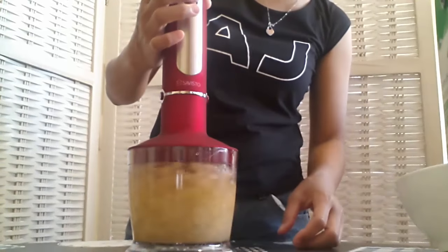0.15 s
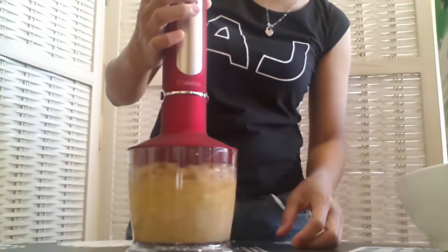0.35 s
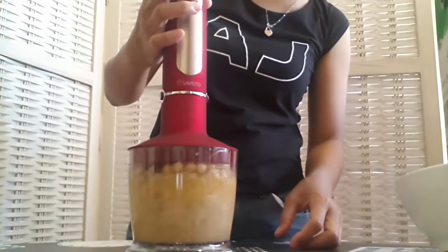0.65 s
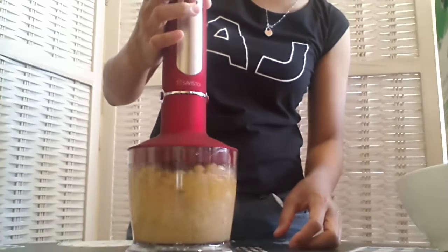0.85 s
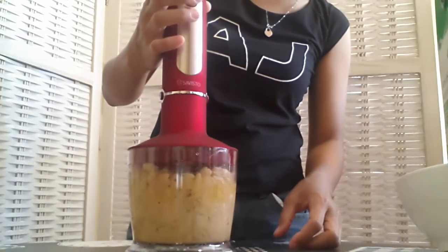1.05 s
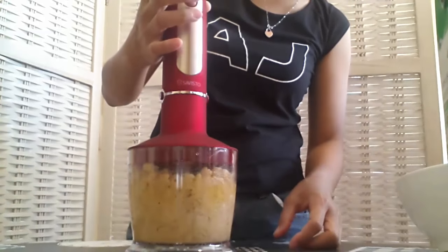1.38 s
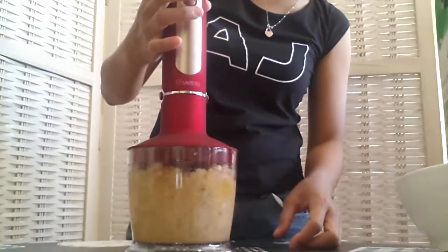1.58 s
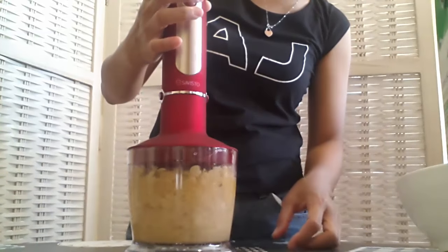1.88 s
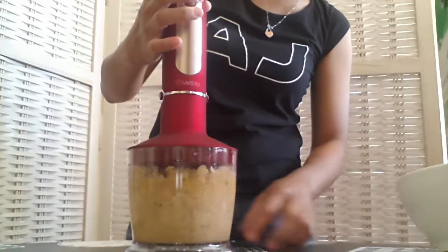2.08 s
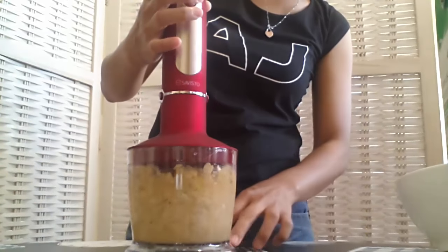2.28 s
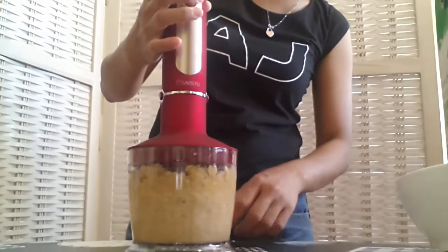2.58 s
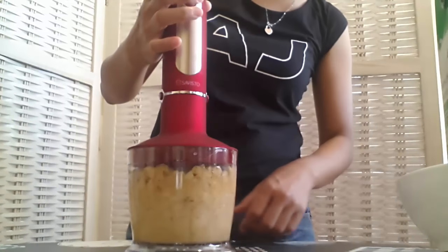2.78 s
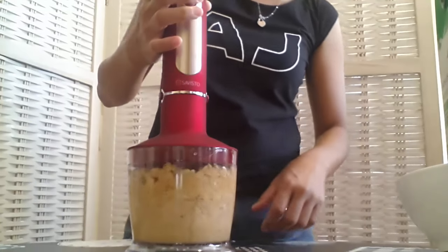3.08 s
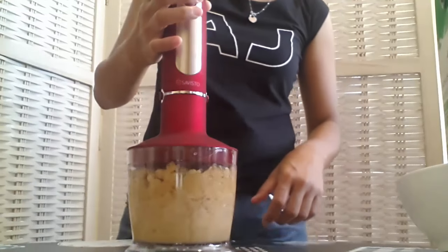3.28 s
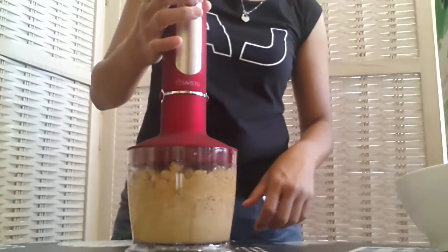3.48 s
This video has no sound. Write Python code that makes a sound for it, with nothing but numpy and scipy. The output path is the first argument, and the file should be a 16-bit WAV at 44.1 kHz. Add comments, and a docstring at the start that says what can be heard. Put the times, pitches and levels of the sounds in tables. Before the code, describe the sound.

An electric hand blender grinds paste, winds down, and thumps back into a steady whir.

```python
"""Hand blender grinding paste

A hand blender on a chopper bowl grinds a thick paste, coasts to a stop, and starts again with a thump.
Its gears whine and rattle in the plastic housing, the motor brushes hiss in time with the mains power,
and the blade churns the food. A small kitchen rings around it, over a quiet background rumble."""
import sys
import numpy as np
from scipy import signal
from scipy.fft import rfft, irfft
from scipy.io import wavfile
from scipy.ndimage import uniform_filter1d

SR = 44100
rng = np.random.default_rng(int(sys.argv[2]) if len(sys.argv) > 2 else 0)


def inscribe(sig):
    """Save sig as 16-bit PCM at rate SR to the path in sys.argv[1].

    A 1-D sig is mono; a 2-D sig holds one channel per row.
    Samples are clipped to [-1, 1] before scaling.
    """
    pcm = np.round(np.clip(np.atleast_2d(sig).T, -1, 1) * 32767)
    wavfile.write(sys.argv[1], SR, pcm.astype(np.int16))


N = 160965
T = np.arange(N) / SR
TEETH, GEAR_RATIO, MAINS_PULSE_HZ = 36, 5, 100
FULL_SPEED = 37  # blade turns a second


def amp(db):
    """Turns decibels into a gain to multiply by."""
    return 10 ** (np.asarray(db) / 20)


def unit(x):
    """Scales a signal to an average (rms) size of 1."""
    return x / np.sqrt(np.mean(x ** 2) + 1e-20)


def curve(points):
    """Joins a table's points over time with straight lines."""
    return np.interp(T, *np.transpose(points))


def read(points, hz):
    """Looks up frequencies in a table, on a scale of octaves."""
    f, value = np.transpose(points)
    return np.interp(np.log(hz + 1), np.log(f + 1), value)


def drift(rate_hz):
    """A random wander of size 1, mostly slower than rate_hz."""
    f = np.fft.rfftfreq(N, 1 / SR)
    return unit(irfft(rfft(rng.standard_normal(N)) * (f > 1) / (1 + (f / rate_hz) ** 4), N))


def body(x, colour, rings):
    """Gives x an object's broad tone colour and the pitches it rings at."""
    hz = np.fft.rfftfreq(8192, 1 / SR)
    db = read(colour, hz) + sum(lift / (1 + (2 * (hz - f) / width) ** 2) for f, width, lift in rings)
    log_gain = np.log(amp(np.r_[db, db[-2:0:-1]]))
    response = np.fft.ifft(np.exp(np.conj(signal.hilbert(log_gain)))).real  # rings only after a hit
    return unit(signal.oaconvolve(x, response[:len(hz)])[:N])


# How fast the blade spins: (time [s], speed [turns/s])
BLADE_SPEED = [(0, 37.0), (.18, 36.52), (.46, 36.9), (.56, 36.65), (.66, 37.0), (.8, 37.2), (.915, 37.0),
               (.96, 32.5), (1.05, 21), (1.25, .5), (1.465, .5), (1.5, 14), (1.52, 28), (1.55, 32.6),
               (1.58, 35.8), (1.62, 37.1), (1.92, 37.17), (2.01, 37.57), (2.3, 37.6), (2.45, 37.96),
               (2.84, 38.11), (2.95, 37.8), (3.03, 38.12), (3.25, 38.29), (3.65, 38.6)]


def motor():
    """The motor runs, stops and restarts: gives the blade's speed, turns so far and acceleration."""
    steady = curve(BLADE_SPEED)
    speed = steady * (1 + .0006 * drift(14))
    return speed, np.cumsum(speed) / SR, uniform_filter1d(np.gradient(steady, T), size=600)


# Repeating swells in the load: (rate [cycles/turn], gear and paste depth [0-1], hiss depth [0-1])
LOAD_SWELLS = [(1, .17, .27), (2, .19, .27), (3, .04, .33), (GEAR_RATIO, .22, .05)]
GEAR_COLUMN, HISS_COLUMN = 1, 2


def load(turns, column):
    """The blade works unevenly within each turn, so the level pulses."""
    return 1 + sum(row[column] * np.cos(2 * np.pi * (row[0] * turns + rng.random()))
                   for row in LOAD_SWELLS)


# How loud the gears rattle: (time [s], level [dB])
RATTLE_LEVEL = [(0, -17), (.3, -16.5), (.9, -16.5), (.96, -19), (1.02, -27.5), (1.1, -50), (1.2, -45),
                (1.3, -65), (1.47, -58), (1.501, -26.5), (1.513, -9.5), (1.56, -17.5), (1.59, -17.5),
                (2.1, -17), (2.8, -17), (3.65, -18)]
# Tone colour of the plastic housing: (frequency [Hz], level [dB])
HOUSING_COLOUR = [(25, -14.5), (50, -19.5), (110, -10.5), (175, -14), (250, -9.5), (330, -3), (520, -2.5),
                  (600, -4.5), (700, 0), (870, -9), (1050, -4.5), (1500, 1.5), (2200, -7), (2600, -0.5),
                  (3100, -9.5), (3600, -12.5), (4500, -21), (8000, -30), (16000, -56)]
# Where the housing rings: (frequency [Hz], width [Hz], boost [dB])
HOUSING_PEAKS = [(329.4, 34, 5.5), (449, 43, 9.5), (768.4, 63, 6.5), (959, 120, 7), (1470, 500, -1),
                 (1844, 60, 1), (2757, 80, 6.5), (3585, 180, 3.5)]


def rattle(turns, spread_db=3.5, scatter_teeth=.3):
    """Every gear tooth knocks on the housing, a little early or late, with its own force."""
    force, scatter = rng.standard_normal((2, N))
    teeth = np.arange(int(turns[-1] * TEETH))
    contact = teeth + scatter_teeth * scatter[teeth] + rng.random(N)[teeth]
    hit_samples = np.interp(contact, turns * TEETH, np.arange(N)).astype(int)
    strength = amp(spread_db * np.minimum(force[teeth], 2)) * rng.choice([-1, 1], N)[teeth]
    knocks = np.bincount(hit_samples, strength, N) * load(turns, GEAR_COLUMN)
    knocks *= amp(drift(24.8))  # lumps sway the level by about 1 dB
    return body(knocks, HOUSING_COLOUR, HOUSING_PEAKS) * amp(curve(RATTLE_LEVEL))


# How loud the brushes hiss: (time [s], level [dB])
BRUSH_LEVEL = [(0, -25.5), (.5, -24), (.92, -24), (1.0, -45), (1.1, -50), (1.3, -80), (1.47, -78),
               (1.515, -24), (1.55, -24), (1.6, -25), (2.15, -24), (2.8, -25), (3.65, -25.5)]
# Tone colour of the hiss: (frequency [Hz], level [dB])
BRUSH_COLOUR = [(25, -58), (2500, -38.5), (3600, 3), (4200, -1), (4500, -10.5), (6300, -10), (7000, -8),
                (8400, -8.5), (8900, -16.5), (10100, -19.5), (10600, -11.5), (11500, -13.5), (12700, -21.5),
                (16000, -22)]
# Where the motor rings: (frequency [Hz], width [Hz], boost [dB])
MOTOR_PEAKS = [(3935, 286, 11.4), (4900, 150, 3.6)]


def brushes(turns, mains_depth=.36):
    """The motor's sliding contacts hiss, pulsing with the mains and the load."""
    pulse = load(turns, HISS_COLUMN) * (1 + mains_depth * np.cos(2 * np.pi * MAINS_PULSE_HZ * T))
    return body(rng.standard_normal(N) * pulse, BRUSH_COLOUR, MOTOR_PEAKS) * amp(curve(BRUSH_LEVEL))


# How loud the food churns: (time [s], level [dB])
CHURN_LEVEL = [(0, -19.5), (.3, -18), (.8, -20.5), (.96, -21.5), (1.15, -59), (1.49, -78), (1.53, -19),
               (1.7, -22.5), (2.1, -23.5), (2.8, -33.5), (3.65, -31.5)]
# Tone colour of the paste: (frequency [Hz], level [dB])
PASTE_COLOUR = [(25, -25), (200, -23.5), (350, -8), (480, -0.5), (620, -9), (1500, -11.5), (2100, -12.5),
                (3000, -14), (16000, -86)]
# Where the bowl rings: (frequency [Hz], width [Hz], boost [dB])
BOWL_PEAKS = [(496, 48, 14.5), (1892, 184, 20.8)]


def churn(turns, lumps_db=2, pitch_sway=.03034, split_hz=900):
    """The blade throws lumps of paste against the bowl, less as the paste gets smooth."""
    lumps = rng.standard_normal(N) * load(turns, GEAR_COLUMN) * amp(lumps_db * drift(44))
    bowl = body(lumps, PASTE_COLOUR, BOWL_PEAKS)
    low = signal.sosfilt(signal.butter(2, split_hz, fs=SR, output="sos"), bowl)
    high = signal.sosfilt(signal.butter(2, split_hz, "high", fs=SR, output="sos"), bowl)
    bent_time = T + np.cumsum(pitch_sway * drift(7.27)) / SR  # moving paste shifts the bowl's low ring
    return (np.interp(bent_time, T, low) + high) * amp(curve(CHURN_LEVEL))


# Pitch of each gear tone: (rate [cycles per blade turn])
GEAR_TONES = [7, 12, 21, 27, 33, 34, 35, 36, 37, 39, 40, 42, 48, 76]
# Strength of those tones, in the same order: (level [dB])
GEAR_LEVELS = [-45.5, -32.5, -35.5, -40, -37.5, -31.5, -43, -31.5, -32.5, -30.5, -41, -32, -46.5, -29.5]
# Strength of the whine an octave above the tooth rate: (time [s], level [dB])
OCTAVE_LEVEL = [(0, -32), (.4, -28), (.9, -31), (1.6, -33), (1.95, -30), (2.1, -24), (2.6, -22), (2.9, -25),
                (3.25, -24.5), (3.65, -27)]


def whine(turns, speed, acceleration, flutter=.2, ring_hz=4010, ring_width_hz=230):
    """Meshing teeth sing a cluster of tones, an octave, and a shrill note at three times their rate."""
    ripple = np.sin(2 * np.pi * MAINS_PULSE_HZ * T)  # the motor's pull pulses with the mains

    def tone(multiple, swing=0):
        phase = 2 * np.pi * (multiple * turns + rng.random()) + swing * ripple + flutter * drift(38)
        return np.sqrt(2) * np.cos(phase) * (1 + flutter * drift(24))
    mesh = sum(amp(db) * tone(multiple) for multiple, db in zip(GEAR_TONES, GEAR_LEVELS))
    octave = amp(curve(OCTAVE_LEVEL)) * tone(2 * TEETH, swing=.5) * load(turns, GEAR_COLUMN)
    shrill_phase = 2 * np.pi * 3 * TEETH * turns + 1.5 * ripple + .6 * drift(25)
    shrill = np.cos(shrill_phase) * load(turns, HISS_COLUMN)
    housing_ring = signal.lfilter(*signal.iirpeak(ring_hz, ring_hz / ring_width_hz, SR), shrill)
    shrill = amp(-25.5) * unit(.21 * shrill + housing_ring)
    pressure = 1 + 2.6 * np.tanh(np.maximum(acceleration, 0) / 110) ** 2  # speeding up presses harder
    return (mesh + octave + shrill) * pressure * (speed / FULL_SPEED) ** 3


def hum(turns, speed, flutter=.54):
    """Each of the blade's two wings pushes the bowl as it passes."""
    pushes = np.sin(2 * np.pi * 2 * turns) * (1 + flutter * drift(10))
    return amp(-46) * unit(pushes * (speed / FULL_SPEED) ** 2)


# Tone colour of the background: (frequency [Hz], level [dB])
BACKGROUND_COLOUR = [(18, -59), (30, -23), (75, -22), (222, 2.5), (374, -9.5), (597, -8.5), (1340, -16.5),
                     (1830, -17.5), (2840, -30), (8470, -37), (13500, -32), (15000, -48.5)]
# Pitches that stand out in it: (frequency [Hz], width [Hz], boost [dB])
BACKGROUND_PEAKS = [(232, 23.4, 2), (590, 65, 9), (1750, 45, 12), (4620, 150, 6)]


def background():
    """A quiet, steady rumble, partly shared by both ears."""
    shared, left, right = (body(rng.standard_normal(N), BACKGROUND_COLOUR, BACKGROUND_PEAKS)
                           for _ in range(3))
    return amp(-47) * unit(shared + 1.6 * np.array([left, right]))


def squeak(peak_s=1.18, width_s=.035, pitch_hz=2460):
    """The shaft squeaks faintly in its last turn before the stop."""
    swell = np.exp(-((T - peak_s) / width_s) ** 2)
    return amp(-48) * swell * np.sin(2 * np.pi * pitch_hz * T + 1.2 * drift(50))


# The notes of the table's boom: (frequency [Hz], level [dB], time to fade by 60 dB [s])
BOOM_NOTES = [(223, -4.5, .3), (272, -1.5, 0.12), (343, -9, 0.1)]


def thump(start_s=1.462, rise_s=.008):
    """Pressing the switch pushes the bowl against the table, which booms."""
    t = np.maximum(T - start_s, 0)
    ring = sum(amp(db - 60 * t / fade_s) * np.sin(2 * np.pi * hz * t) for hz, db, fade_s in BOOM_NOTES)
    return amp(-15) * np.minimum(t / rise_s, 1) * ring


# How long the kitchen rings: (frequency [Hz], time to fade by 60 dB [s])
ECHO_FADE = [(100, 0.25), (250, 0.66), (1000, 0.49), (4000, 0.21), (14000, 0.28)]
# How strong its echo is: (frequency [Hz], level [dB])
ECHO_LEVEL = [(60, -1.5), (300, -8), (800, -1), (2500, -2), (5000, 4.5), (14000, 5.5)]


def echo(x):
    """A wash of reflections for each ear, each pitch range dying at its own speed."""
    reflections = rng.standard_normal((2, SR // 2)) * (T[:SR // 2] > .003)
    hz, t, bands = signal.stft(reflections, SR, nperseg=256)
    fade_s = read(ECHO_FADE, hz)[:, None]
    bands *= amp(read(ECHO_LEVEL, hz)[:, None] - 60 * t / fade_s)
    bands *= np.sqrt(2 * np.log(1000) / (fade_s * SR))  # a longer fade adds no energy
    response = signal.istft(bands, SR, nperseg=256)[1]
    return signal.fftconvolve(x[None], response, axes=1)[:, :N]


def kitchen(x, echoes=7, crossfade_hz=2.6):
    """Several echoes fade slowly in and out, so the room rings smoothly with no fixed pitches."""
    shares = np.array([drift(crossfade_hz) for _ in range(echoes)])
    return sum(echo(x * share) for share in shares / np.linalg.norm(shares, axis=0))


# Balance between the ears: (frequency [Hz], left minus right [dB])
BALANCE = [(60, -6.5), (330, -3.5), (480, -1), (780, -4.5), (1400, -4.5), (1880, -2), (2200, -3),
           (2750, -6), (3300, -1.5), (4000, -10), (4500, -5.5), (6500, -8.5), (8300, -5.5), (9500, -1),
           (11000, -2.5), (14000, -0.5)]


def place_right(stereo):
    """The blender is nearer the right ear, so that side is louder."""
    sides = amp(np.outer([.5, -.5], read(BALANCE, np.fft.rfftfreq(N, 1 / SR))))
    return irfft(rfft(stereo) * sides / np.sqrt((sides ** 2).mean(0)), N)


def scene():
    """Mixes the blender, its echo and the background; tones echo less than noises."""
    speed, turns, acceleration = motor()
    noise = rattle(turns) + brushes(turns) + churn(turns)
    tones = whine(turns, speed, acceleration) + hum(turns, speed) + squeak() + thump()
    in_room = noise + tones + kitchen(noise + amp(-14) * tones)
    return amp(-2) * place_right(in_room) + background()


def record(dry, ceiling=.95, top_hz=15700):
    """Rounds off the tallest peaks, then cuts the very highest treble."""
    rounded = dry / (1 + (dry / ceiling) ** 6) ** (1 / 6)
    treble_cut = signal.firwin(511, top_hz, window=("kaiser", 9), fs=SR)
    return signal.oaconvolve(rounded, treble_cut[None], "same", axes=1)


dry = scene()
out = record(dry)
inscribe(out)
```